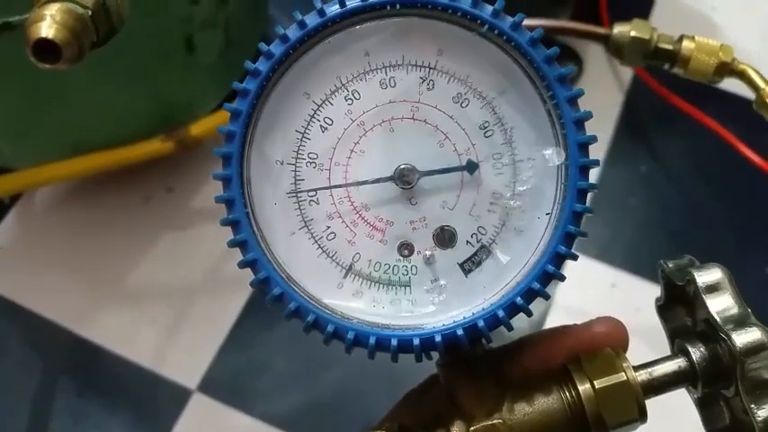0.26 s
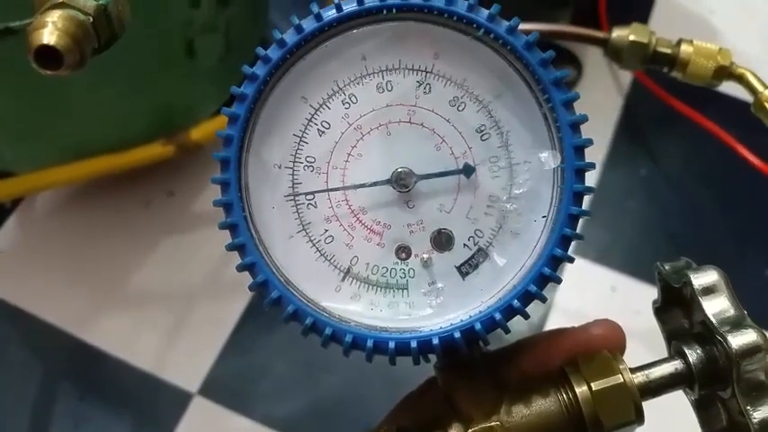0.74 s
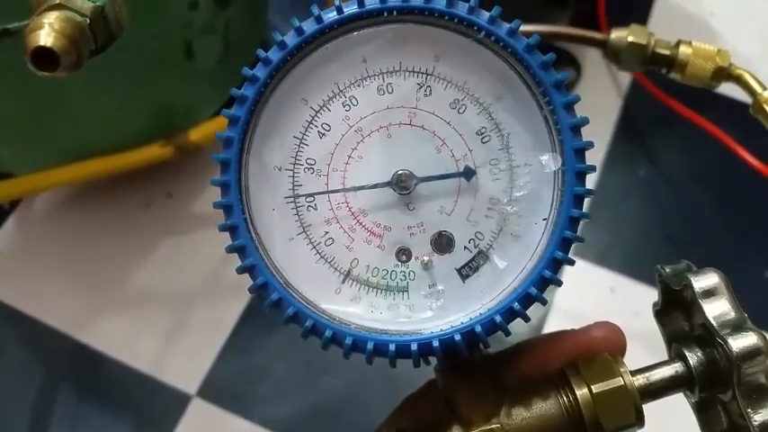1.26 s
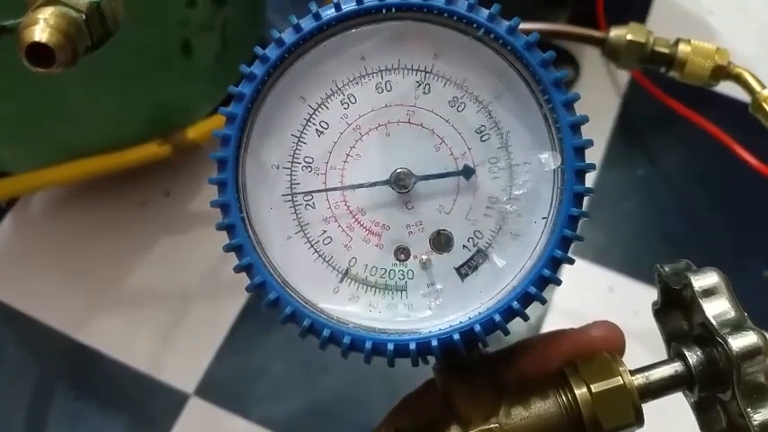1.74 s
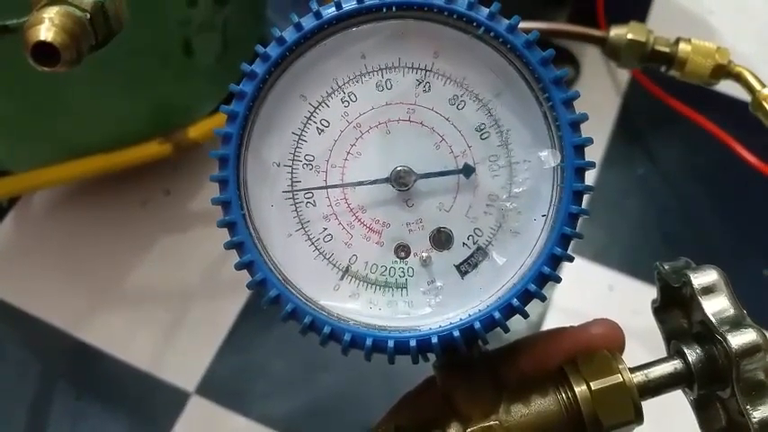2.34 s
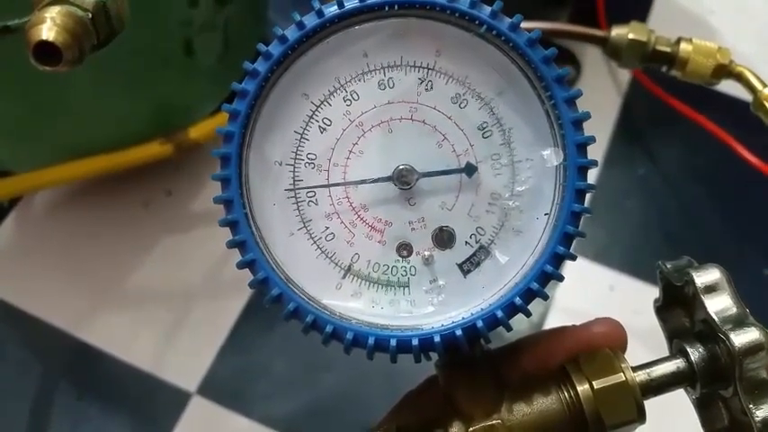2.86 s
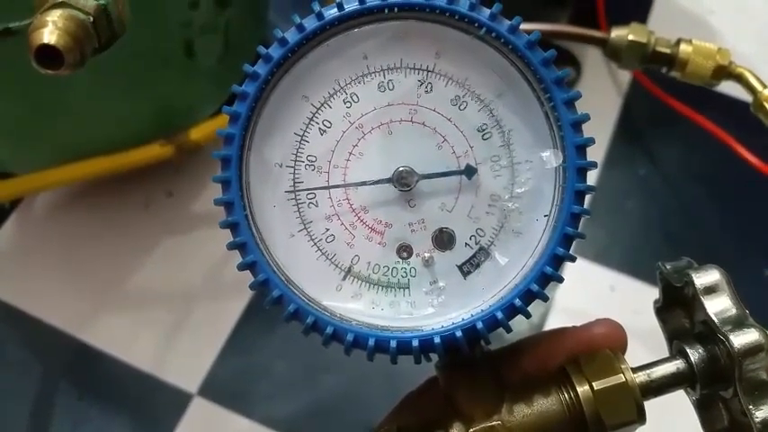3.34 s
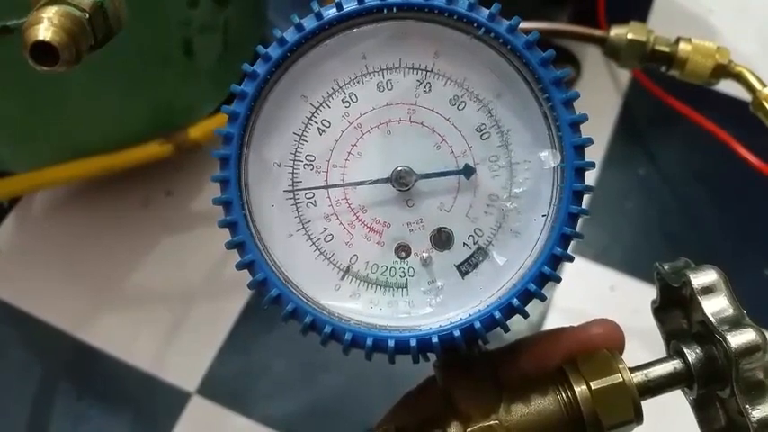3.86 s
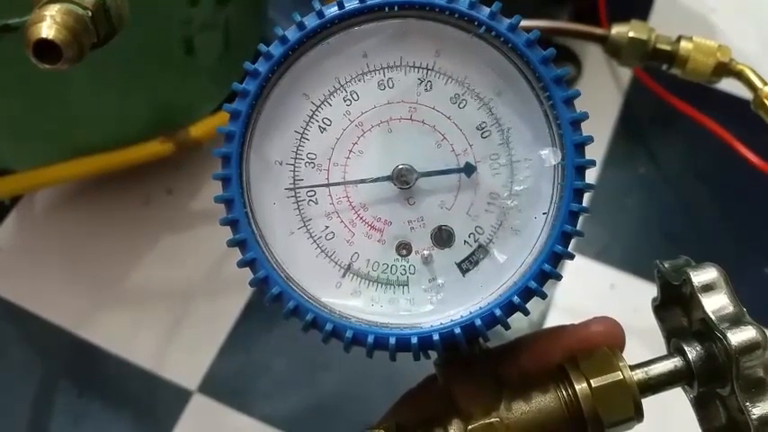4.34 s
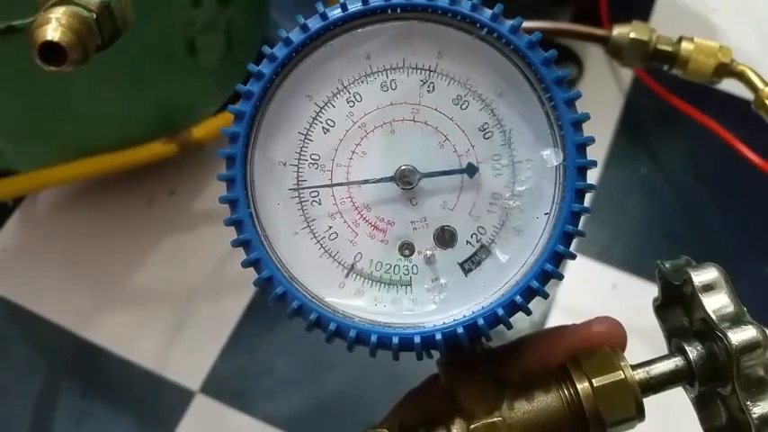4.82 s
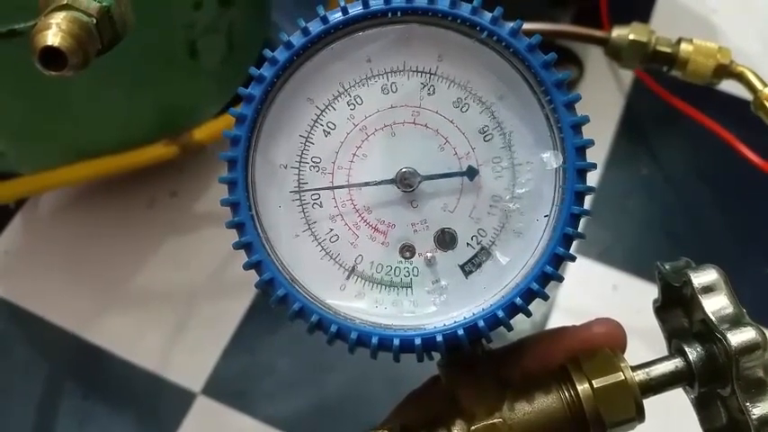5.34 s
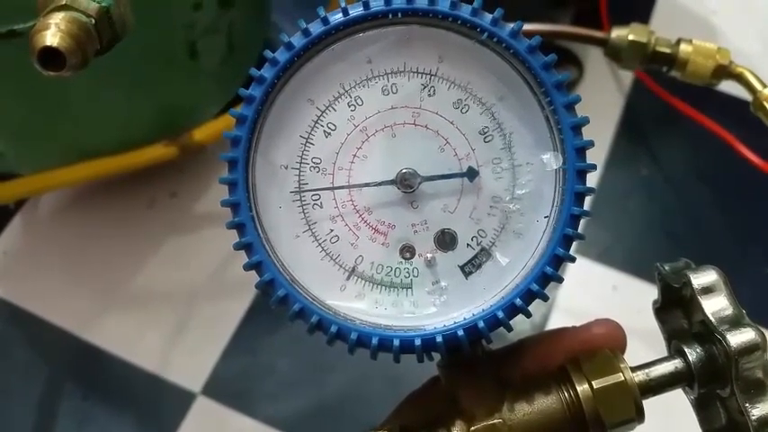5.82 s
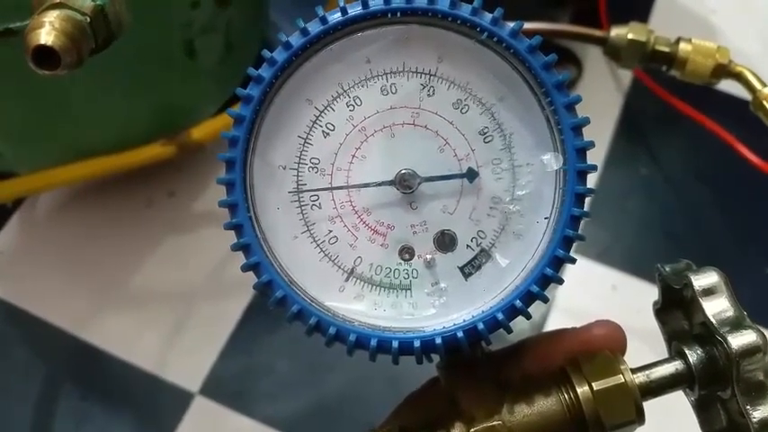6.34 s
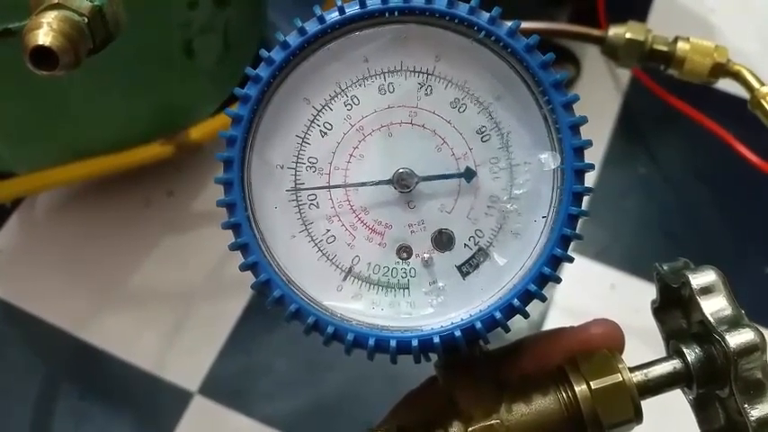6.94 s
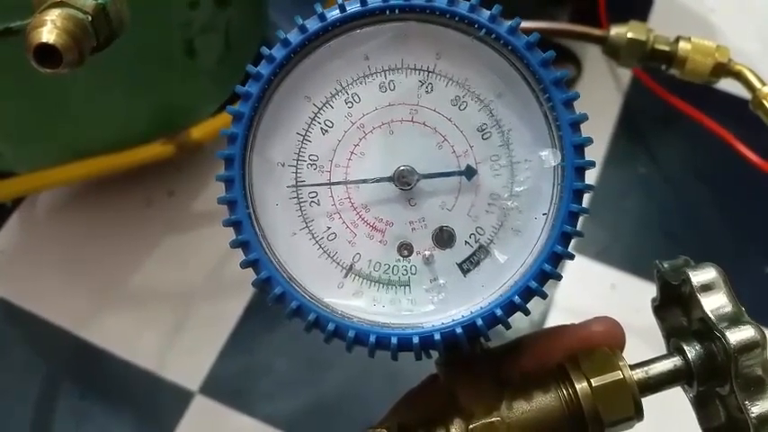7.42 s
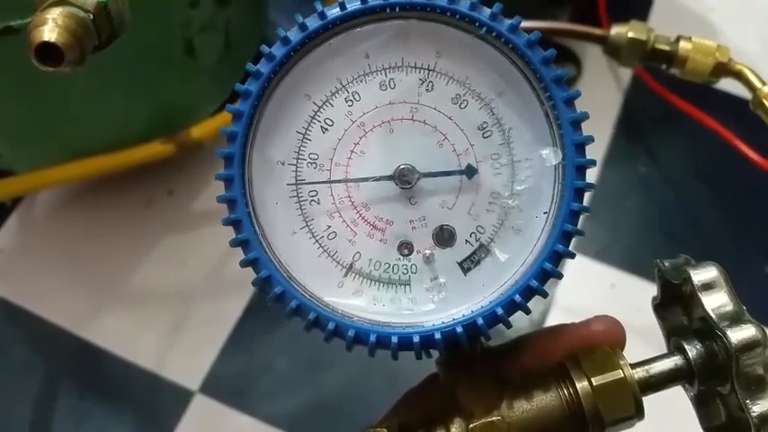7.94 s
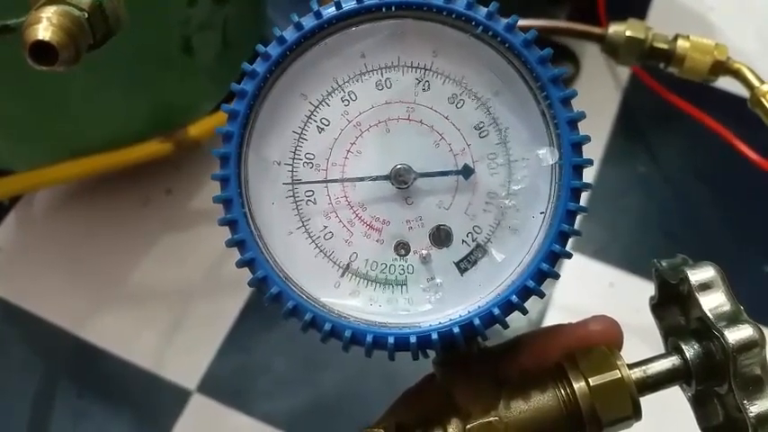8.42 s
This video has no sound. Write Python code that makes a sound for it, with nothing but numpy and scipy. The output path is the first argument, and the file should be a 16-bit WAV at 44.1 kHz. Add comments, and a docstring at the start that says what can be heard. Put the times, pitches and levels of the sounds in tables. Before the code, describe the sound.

Air hisses steadily through the pipes of a small running compressor, fluttering quickly with the piston strokes. Underneath, the motor hums and a low drone swells softly about every second, along with a faint fan-like whirr. The metal casing sizzles and now and then gives a tiny knock. The machine keeps going throughout, with a broad, even rush of workshop noise around it.

```python
"""A steady, pulsing hiss over a low throb: a small sealed compressor pumps air into a steel cylinder.
The piston runs just under mains speed and the motor hums. A low drone beats against a slower rotor,
likely a fan, and a broad rush fills the workshop. Air hisses through shell and pipe resonances,
swelling with each stroke; the shell sizzles unevenly and now and then knocks."""
import sys
import numpy as np
from scipy import signal
from scipy.fft import rfft, irfft
from scipy.io import wavfile

SR = 44100
rng = np.random.default_rng(int(sys.argv[2]) if len(sys.argv) > 2 else 0)


def transcribe(signal):
    """Save signal, clipped to [-1, 1], as a 16-bit WAV file at the path in sys.argv[1]."""
    frames = np.atleast_2d(signal).T
    limited = np.clip(frames, -1, 1)
    pcm = np.round(limited * 32767).astype(np.int16)
    wavfile.write(sys.argv[1], SR, pcm)


N = 382788
TIME, BINS = np.arange(N) / SR, np.fft.rfftfreq(N, 1 / SR)
SHAFT_HZ, MAINS_HZ, FAN_HZ = 49.6, 50.16, 21.064
CRANK = np.sin(2 * np.pi * SHAFT_HZ * TIME)


def gain_of(db):
    """Decibels to amplitude."""
    return 10 ** (np.asarray(db) / 20)


def unit_rms(x):
    """Scales to rms 1."""
    return x / np.sqrt(np.mean(x ** 2) + 1e-20)


def spectral_curve(points):
    """Joins points by lines on a log frequency axis."""
    hz, value = np.transpose(points)
    return np.interp(np.log(BINS + 1), np.log(hz + 1), value)


def wander(rate_hz):
    """Random drift of rms 1, mostly slower than rate_hz."""
    spectrum = rfft(rng.standard_normal(N)) * (BINS > 0)
    return unit_rms(irfft(spectrum / (1 + (BINS / rate_hz) ** 2), N))


def resonance(hz, width_hz):
    """Gain over frequency of one resonance, 1 at its peak."""
    return 1 / (1 + (2 * (BINS - hz) / width_hz) ** 2)


def turbulence(envelope, colour, likeness):
    """Stereo air noise; the size of likeness says how alike the sides are, its angle how far left leads."""
    left, unrelated = rfft(rng.standard_normal((2, N)) * np.sqrt(SR / 2) * envelope)
    spread = np.sqrt(np.maximum(1 - abs(likeness) ** 2, 0))
    right = np.conj(likeness) * left + spread * unrelated
    return irfft(np.array([left, right]) * colour, N)


def tones(base_hz, partials, drift_turns, flutter_db, right_lag_s=0.00016):
    """Wavering harmonics of one rotation, arriving a little later on the right."""
    turns = base_hz * TIME + drift_turns * wander(1.7)
    out = np.zeros((2, N))
    for harmonic, db in partials:
        phase = 2 * np.pi * (harmonic * turns + rng.random())
        lag = 2 * np.pi * harmonic * base_hz * right_lag_s
        out += np.sqrt(2) * gain_of(db + flutter_db * wander(2.4)) * np.cos([phase, phase - lag])
    return out


# Colour of the noise bed: frequency_hz, level_db_per_hz (before trim)
RUSH_COLOUR = [(15, -88), (45, -81.5), (60, -81.7), (85, -78), (180, -76.2), (270, -79.2), (340, -83.3),
               (500, -82.5), (850, -82.9), (1300, -83.8), (1800, -95.4), (3900, -95), (4700, -115),
               (5600, -90.4), (8200, -104.5), (10700, -102.6)]
# How alike its left and right are: frequency_hz, likeness_0_to_1
RUSH_LIKENESS = [(70, 1.0), (130, 0.98), (200, 0.985), (250, 0.92), (305, 0.62), (365, 0.97), (550, 0.2),
                 (900, 0)]

def room_rush(trim=0.83):
    """A broad rush from all round the room, centred only in the bass."""
    return turbulence(trim, gain_of(spectral_curve(RUSH_COLOUR)), spectral_curve(RUSH_LIKENESS))


# Whirr of the fan: harmonic, level_db
FAN_PARTIALS = [(2, -71.5), (3, -73.5), (5, -67.5), (6, -73), (8, -64.5), (9, -71), (10, -70), (12, -71),
                (18, -68), (21, -72)]

def fan():
    """The slow rotor sounds multiples of its turning rate."""
    return tones(FAN_HZ, FAN_PARTIALS, drift_turns=0.003, flutter_db=1.2)


# Uneven depth of the once-a-second low throb: time_s, level_db
THROB_DEPTH = [(0, -67), (1.6, -63), (2.7, -68), (4.6, -62.5), (5.6, -70), (6.6, -61), (8.68, -64)]

def throb(drone_hz=148.44, drone_db=-57.2, crest_s=0.59):
    """A low drone lies 1 Hz above the fan's seventh harmonic, so the pair swells once a second."""
    phase_per_hz = 2 * np.pi * (TIME - crest_s)
    drone = gain_of(drone_db) * np.cos(drone_hz * phase_per_hz)
    depth_db = np.interp(TIME, *np.transpose(THROB_DEPTH))
    beating_tone = gain_of(depth_db) * np.cos(7 * FAN_HZ * phase_per_hz)
    return np.sqrt(2) * (drone + beating_tone)


# Hum of the motor: harmonic, level_db (before trim)
MOTOR_PARTIALS = [(2, -70), (4, -56), (6, -65), (8, -73), (10, -73)]

def motor(trim_db=-0.5):
    """The motor iron hums magnetically at even multiples of the mains."""
    return gain_of(trim_db) * tones(MAINS_HZ, MOTOR_PARTIALS, drift_turns=0.0017, flutter_db=-0.5)


# Thin ringing of pipes and mounts: pitch_hz, width_hz, level_db, left_lead_rad
MOUNT_RINGS = [(96.2, 2, -67, 0), (481, 2, -69, 0.3), (577.4, 2, -71, 0.3), (770, 2, -72, 0.5),
               (1113, 30, -69, 1.0), (1594, 10, -64, 2.0), (1658, 6, -63.5, 2.0), (2541, 30, -61, -0.7),
               (3644, 40, -66, 0.5), (5888, 30, -68, -0.1)]

def ringing_mounts():
    """Vibration keeps a few lightly damped parts singing."""
    return sum(gain_of(db) * unit_rms(turbulence(1, resonance(hz, width), np.exp(1j * lead)))
               for hz, width, db, lead in MOUNT_RINGS)


# Buzz of the piston: harmonic, level_db
PISTON_PARTIALS = [(2, -70), (12, -68.5), (14, -63.8), (15, -71), (21, -72), (31, -71)]

def piston():
    """One stroke a turn makes a buzz on multiples of the shaft rate."""
    return tones(SHAFT_HZ, PISTON_PARTIALS, drift_turns=0.0023, flutter_db=1.0)


# Resonances of shell, pipe and cylinder:
# pitch_hz, width_hz, left_db_per_hz, right_db_per_hz, left_lead_rad, likeness_0_to_1
MODES = [(435.0, 195.0, -82.3, -80.8, -0.1, 1.0), (590.0, 260.0, -80.2, -81.4, 0.5, 0.85),
         (740.0, 135.0, -82.7, -82.1, 0.2, 0.9), (1015.0, 220.0, -80.8, -85.5, 2.92, 0.7),
         (1130.0, 180.0, -76.3, -79.6, 1.02, 0.72), (1520.0, 195.0, -79.4, -81.1, 1.55, 0.56),
         (1605.0, 145.0, -76.5, -71.7, 2.65, 0.65), (1840.0, 80.0, -88.9, -83.9, -2.94, 0.88),
         (1910.0, 55.0, -82.3, -80.9, 2.66, 0.55), (2070.0, 115.0, -75.0, -74.6, 3.04, 0.88),
         (2235.0, 225.0, -91.2, -73.6, -2.97, 0.7), (2420.0, 200.0, -77.0, -70.2, -1.48, 0.79),
         (2530.0, 125.0, -77.2, -65.9, -0.85, 1.0), (2615.0, 240.0, -72.4, -72.3, -0.25, 0.93),
         (2860.0, 290.0, -73.6, -73.6, -0.14, 0.9), (3045.0, 155.0, -72.2, -70.0, -0.65, 0.82),
         (3155.0, 100.0, -87.7, -71.1, 2.19, 0.84), (3465.0, 185.0, -76.3, -76.3, 0.79, 0.57),
         (3610.0, 115.0, -73.3, -78.4, 0.86, 0.59), (3730.0, 250.0, -75.6, -75.1, 0.01, 1.0),
         (3885.0, 195.0, -78.8, -75.2, 1.8, 0.76), (4115.0, 230.0, -71.6, -71.5, 2.25, 0.79),
         (4215.0, 175.0, -72.2, -72.4, 1.7, 0.85), (4420.0, 495.0, -80.4, -80.2, -3.11, 1.0),
         (4780.0, 110.0, -75.0, -74.8, -3.14, 0.98), (4995.0, 1045.0, -78.2, -78.1, -3.14, 1.0),
         (5240.0, 125.0, -79.9, -73.2, -1.26, 0.99), (5380.0, 190.0, -71.2, -71.6, -1.25, 0.94),
         (5635.0, 305.0, -79.5, -79.8, -0.46, 0.96), (5860.0, 160.0, -79.8, -76.9, -0.17, 0.83),
         (6005.0, 75.0, -80.6, -80.1, 0.05, 1.0), (6200.0, 210.0, -79.9, -79.6, -0.01, 0.98),
         (6290.0, 555.0, -80.2, -83.0, 0.38, 0.92), (6345.0, 215.0, -77.4, -84.1, 1.5, 0.87),
         (6800.0, 455.0, -77.1, -80.3, 2.94, 0.73), (7320.0, 160.0, -78.5, -81.6, -1.15, 0.69),
         (7570.0, 535.0, -87.0, -87.2, -0.23, 0.71), (7865.0, 445.0, -78.2, -83.0, 0.2, 0.53),
         (8425.0, 150.0, -85.1, -83.9, 0.12, 0.96), (8750.0, 680.0, -89.4, -89.1, 3.13, 1.0),
         (9070.0, 340.0, -82.0, -83.4, -3.05, 0.71), (9570.0, 130.0, -81.3, -85.5, -2.27, 0.8),
         (9670.0, 685.0, -85.5, -84.7, -2.84, 0.67), (10090.0, 450.0, -87.5, -85.7, -0.19, 0.96),
         (10495.0, 420.0, -83.8, -84.0, 0.02, 0.99)]
BODY_MODES = [mode for mode in MODES if mode[0] < 900]
SHELL_MODES = [mode for mode in MODES if 2300 < mode[0] < 3200]
PIPE_MODES = [mode for mode in MODES if mode not in BODY_MODES + SHELL_MODES]

def blown_steel(modes, envelope):
    """Air noise drives a group of resonances, each heard from its own direction."""
    power, shared = np.zeros((2, len(BINS))), np.zeros(len(BINS), complex)
    for hz, width, left_db, right_db, lead, likeness in modes:
        gain = gain_of([[left_db], [right_db]]) * resonance(hz, width)
        power += gain ** 2
        shared += likeness * gain[0] * gain[1] * np.exp(1j * lead)
    colour = np.sqrt(power)
    return turbulence(envelope, colour, shared / (colour[0] * colour[1]))


def pipe_hiss(trim_db=0.02, sag_db_per_s=0.0647):
    """Air puffs through the valves once a turn; the flow eases as the cylinder fills."""
    puff_db = 0.66 * np.exp(CRANK)
    level_db = puff_db - sag_db_per_s * TIME + 0.3 * wander(14) + 0.26 * wander(60)
    return gain_of(trim_db) * blown_steel(PIPE_MODES, unit_rms(gain_of(level_db)))


def shell_sizzle(burst_db=1.15, sharpness=2.6, sag_db_per_s=0.11):
    """Once a turn the valve chatters against the shell, in an uneven sizzle that slowly eases."""
    chatter_db = burst_db * np.exp(sharpness * (CRANK - 1))
    level_db = chatter_db - sag_db_per_s * TIME + 0.4 * wander(16) + 0.46 * wander(70)
    return blown_steel(SHELL_MODES, unit_rms(gain_of(level_db)))


# Harder hits of the rattle on the shell: start_s, peak_db
SHELL_HITS = [(0.064, -32), (1.741, -28), (1.7455, -30), (1.758, -29), (2.174, -31), (6.661, -31),
              (7.441, -31), (7.448, -30)]

def shell_knocks():
    """Each knock rings the main shell modes for a few milliseconds."""
    t = TIME[:1024]
    ring, hits = np.zeros((2, len(t))), np.zeros(N)
    for hz, width, left_db, right_db, lead, _ in SHELL_MODES:
        decay = width * np.exp(-np.pi * width * t)
        phase = 2 * np.pi * hz * t
        ring += gain_of([[left_db], [right_db]]) * decay * np.cos([phase, phase - lead])
    for start_s, peak_db in SHELL_HITS:
        hits[round(start_s * SR)] = gain_of(peak_db)
    return signal.oaconvolve(hits[None], ring / abs(ring).max(), axes=1)[:, :N]


def scene():
    """The running compressor in stereo: bed, hum, air and knocks."""
    bed = room_rush()
    hum = fan() + throb() + motor() + ringing_mounts() + piston()
    air = blown_steel(BODY_MODES, envelope=1) + pipe_hiss() + shell_sizzle()
    return bed + hum + air + shell_knocks()


def record(dry):
    """A steep low-pass takes off the highest treble."""
    low_pass = signal.firwin(801, cutoff=10870, window=("kaiser", 9), fs=SR)
    return signal.oaconvolve(dry, low_pass[None], "same")


dry = scene()
out = record(dry)
transcribe(out)
```